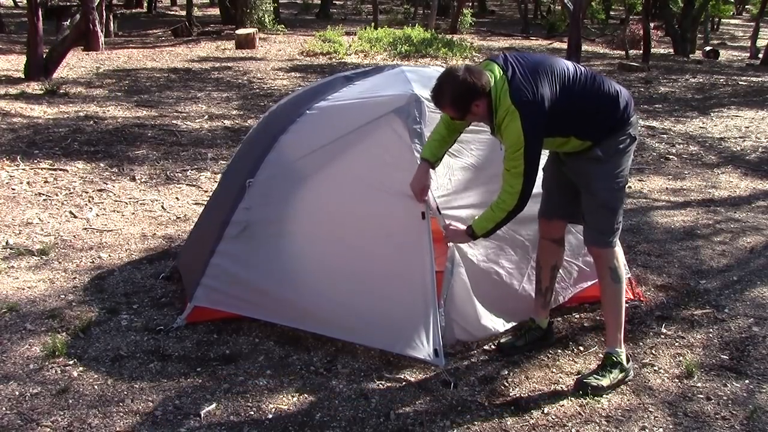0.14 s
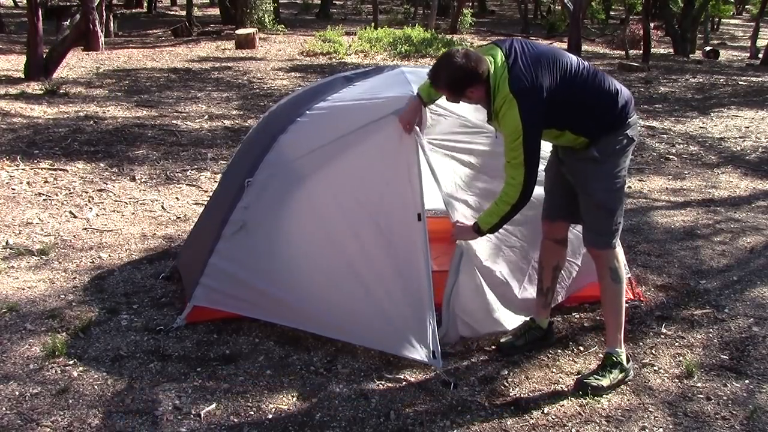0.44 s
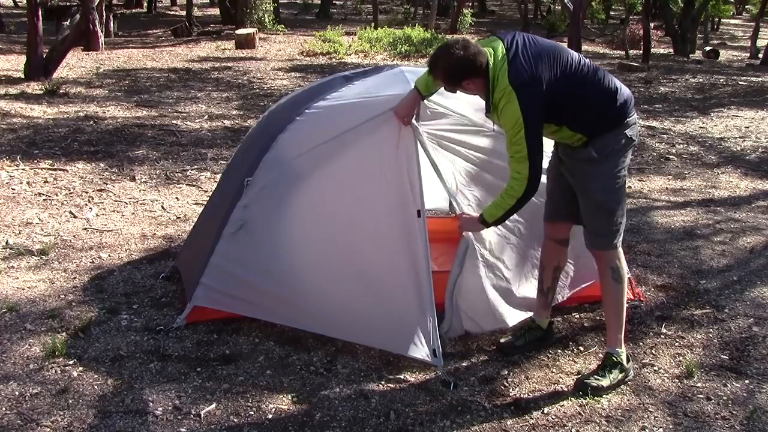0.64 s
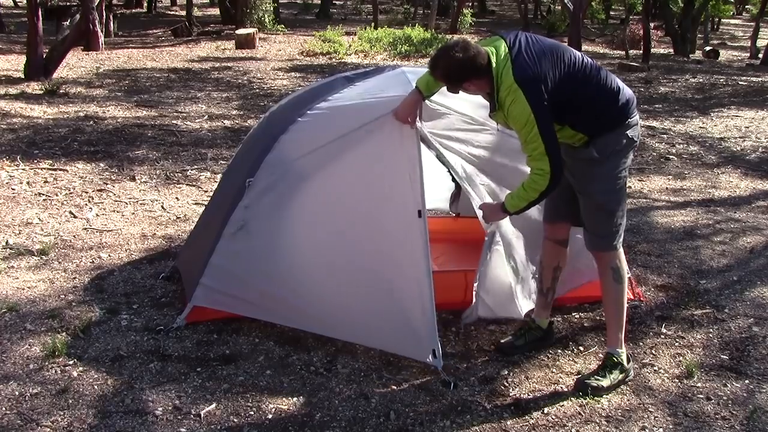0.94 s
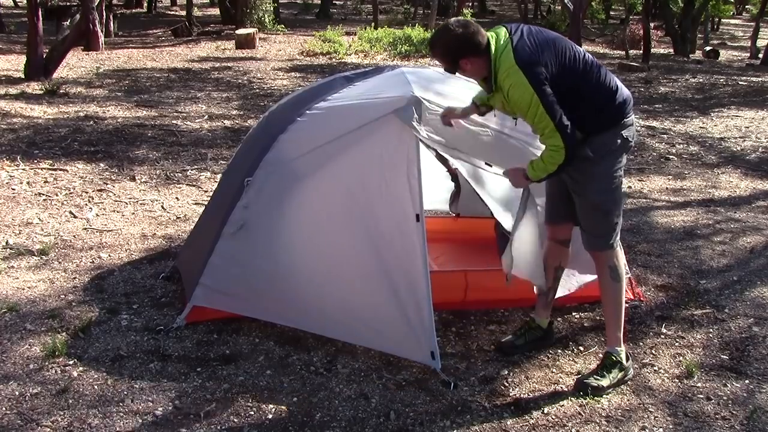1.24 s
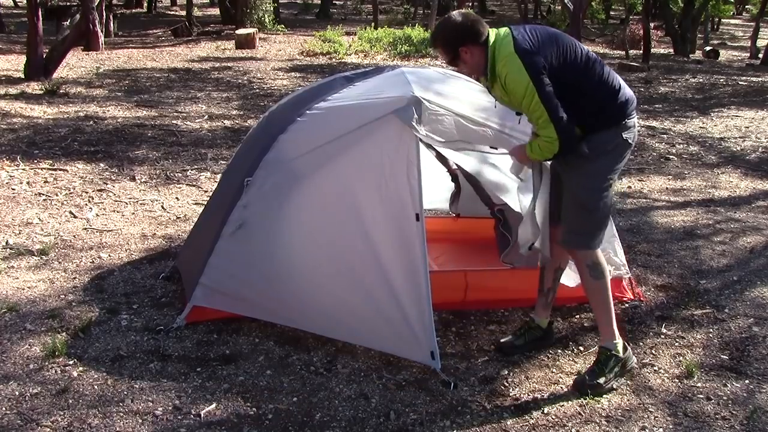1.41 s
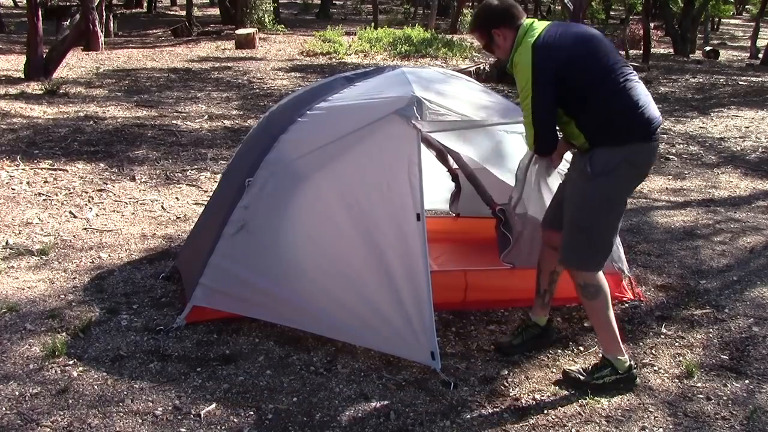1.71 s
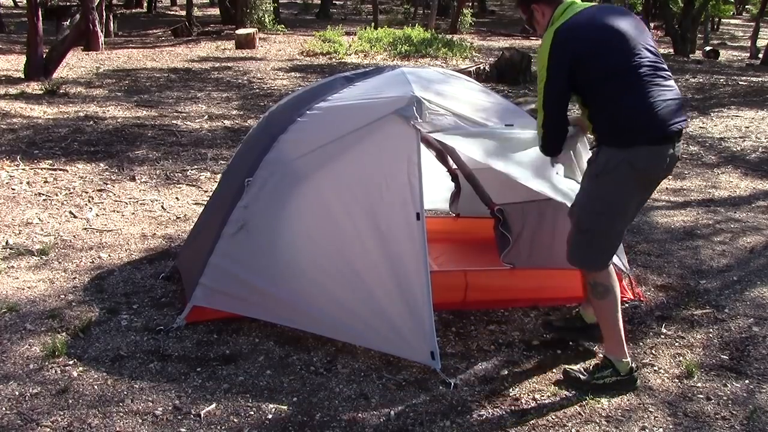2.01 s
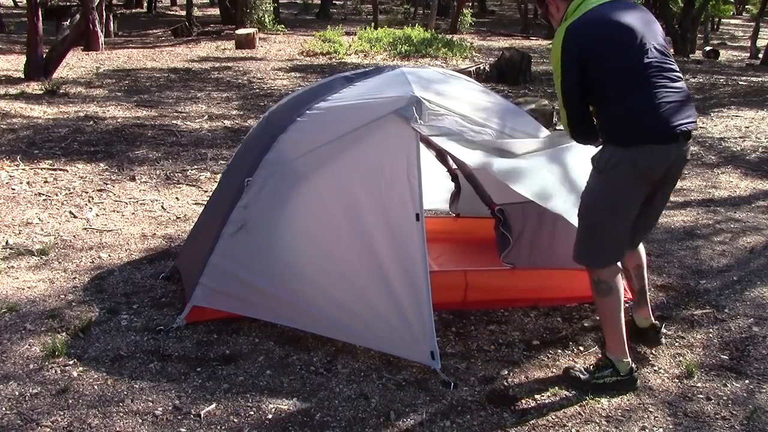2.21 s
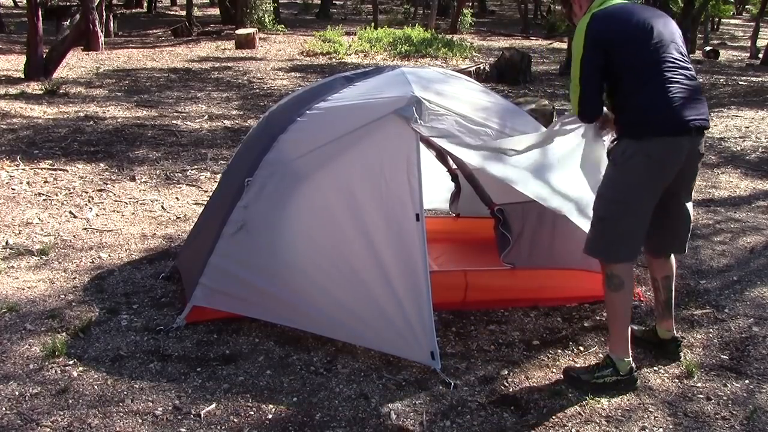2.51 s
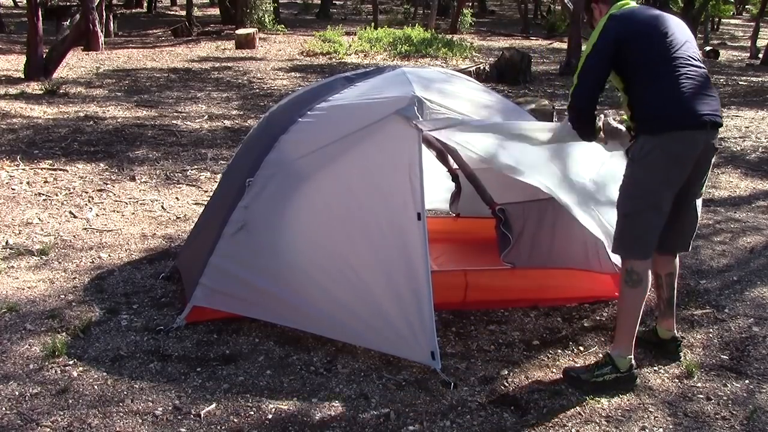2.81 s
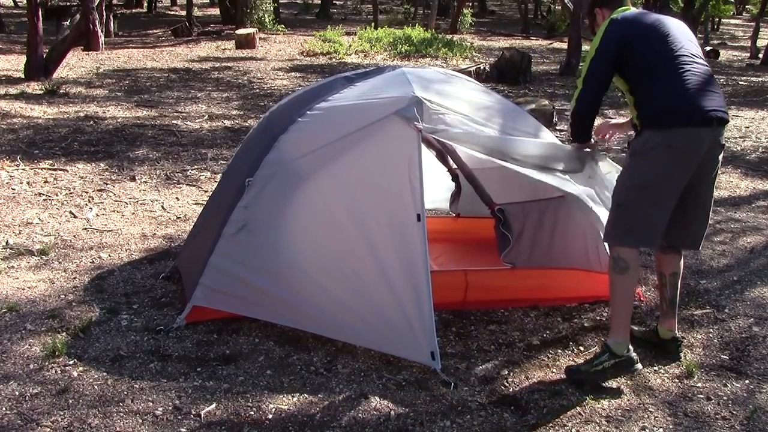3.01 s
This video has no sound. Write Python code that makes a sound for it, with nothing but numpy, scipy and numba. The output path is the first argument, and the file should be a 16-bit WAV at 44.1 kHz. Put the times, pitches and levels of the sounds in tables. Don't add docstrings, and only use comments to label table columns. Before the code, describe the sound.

A tent zipper opens in one pull from about 0.2 to 0.58 seconds, its buzzy tone rising, wavering and stopping with a cloth jerk and snap. Soft rustles and small crackles follow until 1.3, then nylon swishes and pops grow. From 2.0 to 3.1 the door is gathered loudly, with sharp crease snaps, flaps and low air thumps, strongest near 2.0, 2.5 and 2.75. Faint woodland hiss, short echo, muted treble.

```python
import sys
import numpy as np
from scipy import signal
from scipy.fft import rfft, irfft
from scipy.io import wavfile
from scipy.ndimage import uniform_filter1d
from numba import njit

SR = 44100
rng = np.random.default_rng(int(sys.argv[2]) if len(sys.argv) > 2 else 0)


def bounce(signal):
    frames = np.transpose(np.atleast_2d(signal))
    limited = np.clip(frames, -1, 1)
    pcm = np.round(limited * 32767).astype(np.int16)
    wavfile.write(sys.argv[1], SR, pcm)


def attenuation_scalar(level_db):
    decades = np.asarray(level_db, float) / 20
    return 10 ** decades


N = 138915


@njit
def svf(x, hz, width):
    y, band_state, low_state = np.empty(len(x)), 0., 0.
    for i in range(len(x)):
        g, k = np.tan(np.pi * hz[i] / SR), width[i] / hz[i]
        v = (band_state + g * (x[i] - low_state)) / (1 + g * (g + k))
        band_state, low_state, y[i] = 2 * v - band_state, low_state + 2 * g * v, k * v
    return y


def band(x, hz, width):
    return svf(x, np.full(N, 1. * hz), np.full(N, 1. * width))


def unit(x):
    return x / np.sqrt(np.mean(x ** 2))


def walk(rate):
    hold = int(SR / rate)
    steps = np.repeat(rng.standard_normal(N // hold + 1), hold)
    return unit(uniform_filter1d(steps, hold)[:N])


def colour(x, table):
    hz, db = np.array(table).T
    f = np.maximum(np.arange(N // 2 + 1) * SR / N, 1)
    curve_db = np.interp(np.log(f), np.log(hz), db, db[0] - 32, db[-1] - 30)
    return irfft(rfft(x) * attenuation_scalar(curve_db), N)


def clicks(per_s, spread_db):
    place, luck = rng.random((2, int(per_s * 4)))
    size = attenuation_scalar(np.minimum(-spread_db * np.log(luck), 11))
    sign = (-1) ** np.arange(len(size))
    return unit(np.bincount((place * N).astype(int), size * sign, N))


def hump(t, start, length, peak):
    u = np.clip((t - start) / length, 0, 1)
    return np.sin(np.pi / 2 * np.where(u < peak, u / peak, (1 - u) / (1 - peak))) ** 2


# f/Hz, level/dB
WOODS_SPECTRUM = [(24, -48), (40, -29), (150, 3), (800, -20.5), (862, -9.5), (2650, -17), (7560, -22),
                  (9000, -23), (15600, -33.5)]


def woods():
    return attenuation_scalar(-60 + 0.4 * walk(4.6)) * unit(colour(rng.standard_normal(N), WOODS_SPECTRUM))


def echo(t, near):
    t60_s, early = 0.11, t[:8000]
    tail = rng.standard_normal(8000) * attenuation_scalar(-60 * (early / t60_s)) * (early > .004)
    return attenuation_scalar(-20.5) * signal.fftconvolve(near, tail / np.sqrt(np.sum(tail ** 2)))[:N]


def folds(t, events, cycles, tick_db):
    out = np.zeros(N)
    for (start, db, hz), seed in zip(events, rng.random(len(events))):
        u = np.maximum(t - start, 0) * hz
        rise = cycles / 3
        ring = np.sin(2 * np.pi * u) * u / rise * np.exp(1 - u / rise)
        tick = attenuation_scalar(tick_db) * np.sin(2 * np.pi * (2.34 + seed) * u) * np.exp(-u)
        out -= attenuation_scalar(db) * (ring + tick)
    return out


# t/s, peak level/dB, f/Hz
DOOR_BOOMS = [
    (0.189, -30, 194),
    (0.919, -51, 95),
    (1.759, -35.5, 80.5),
    (2.036, -20, 70),
    (2.131, -36, 75.6),
    (2.729, -20, 91),
    (2.875, -26.5, 102),
]


def booms(t):
    return folds(t, DOOR_BOOMS, 1.0, -37)


# t/s, length/s, level/dB,
# centre f/Hz
PANEL_FLAPS = [(0, 0.048, -54.5, 252), (0.138, 0.1, -36.5, 375), (0.148, 0.066, -38.5, 1310),
               (0.187, 0.047, -33, 450), (0.22, 0.57, -34, 326), (0.581, 0.049, -42, 360.4),
               (0.644, 0.079, -36, 360), (0.755, 0.69, -50, 364), (0.195, 0.12, -28, 1000),
               (1.022, 0.089, -42.5, 410), (1.146, 0.16, -44, 367), (1.282, 0.08, -31.5, 336),
               (1.34, 0.14, -37.5, 390), (1.412, 0.11, -37, 960), (1.505, 0.096, -29.5, 343),
               (1.554, 0.24, -37, 355), (1.741, 0.12, -28.5, 370), (1.839, 0.17, -28.5, 370),
               (1.938, 0.033, -27, 278), (1.976, 0.035, -29.5, 354), (2.014, 0.092, -21.5, 272),
               (2.081, 0.13, -28, 354), (2.162, 0.2, -25.5, 357), (2.316, 0.16, -39.5, 375),
               (2.455, 0.097, -30, 286), (2.54, 0.21, -35.5, 345), (2.725, 0.068, -20.5, 366),
               (2.758, 0.12, -37, 287), (2.871, 0.09, -33.5, 422), (2.959, 0.11, -32, 310),
               (3.003, 0.052, -25.5, 1370), (3.018, 0.1, -39, 300), (2.86, 0.034, -40, 1900),
               (0.882, 0.18, -57.5, 1680), (1.19, 0.027, -54, 1770), (2.13, 0.09, -24.5, 2230),
               (2.583, 0.059, -25.5, 2100), (2.641, .06, -23.5, 1960), (2.957, 0.038, -27.5, 1670),
               (3.097, 0.054, -31.5, 1950), (3.132, 0.034, -26, 5000)]


def flaps(t):
    drive = rng.standard_normal(N) + clicks(per_s=220, spread_db=2.6)
    rumble, out = attenuation_scalar(-12.5) * unit(band(drive, 142, 54)), np.zeros(N)
    for start, length, db, hz in PANEL_FLAPS:
        part = slice(int(start * SR), int((start + length) * SR))
        half_hz = 0.52 * min(hz, max(700, 0.41 * hz))
        edges_hz = [hz - half_hz, hz + 1.26 * half_hz]
        panel = signal.butter(2, edges_hz, "band", fs=SR, output="sos")
        body = unit(signal.sosfilt(panel, drive[part]))
        swell = hump(t[part], start, length, peak=0.32) ** .5
        out[part] += attenuation_scalar(db) * swell * (body + rumble[part] * 300 / hz)
    return attenuation_scalar(2 * walk(45)) * out


# t/s, fade/s, level/dB, treble level/dB, tilt/dB per octave
CLOTH_JERKS = [(0, 0.017, -45, -34, -1), (0.577, 0.075, -31.5, -31, 0.5), (0.648, 0.036, -36, -43, 3.5),
               (1.319, 0.0088, -22.5, -40, 1.2), (1.405, 0.07, -35, -38, 1.5),
               (1.522, 0.18, -28.5, -32.5, -0.3), (1.672, 0.031, -28.5, -38, -6),
               (1.945, 0.056, -21.5, -36, -1.5), (1.993, 0.22, -22, -36, -1.8),
               (2.047, 0.055, -16.5, -21.5, 3), (2.463, 0.14, -19, -32, 1.5),
               (2.522, 0.014, -15, -28, -0.5), (2.737, 0.027, -17, -35, 0), (2.885, 0.13, -22.5, -26, -0.3)]
# t/s, length/s, level/dB, treble level/dB, tilt/dB per octave
CLOTH_DRAGS = [(0.128, 0.097, -62, -40, 11.5), (0.177, 0.11, -48.5, -40, 6), (0.831, 0.31, -52, -30, -2.5),
               (1.068, 0.25, -48, -29, -4.5), (1.262, 0.17, -38.5, -36, 2), (1.551, 0.1, -34.5, -29, 8),
               (1.664, 0.13, -40, -32, -16.5), (1.738, 0.13, -29, -39, -2), (1.815, .1, -29, -31, 1),
               (1.902, 0.058, -32, -30, -7), (2.074, 0.16, -22.5, -29.5, -2),
               (2.191, 0.14, -19.5, -22.5, 0.1), (2.285, 0.14, -23.5, -32, 0), (2.37, 0.17, -23, -44, 0.9),
               (2.545, 0.074, -26.5, -42, 5), (2.59, 0.073, -16.5, -21.5, 2.3),
               (2.615, 0.18, -26.5, -36, -0.5), (2.746, 0.077, -37, -42, -14.5),
               (2.805, 0.2, -41.5, -32, -9.5), (2.942, 0.14, -22, -23, -2), (3.025, 0.12, -38, -29, -7),
               (3.123, 0.063, -25.5, -20.5, -3.5)]
# f/Hz, level/dB
CLOTH_SPECTRUM = [(290, 1), (500, -7.5), (786, -8.5), (1970, -4), (4700, -4), (7000, -3.5), (9100, -10.5),
                  (15400, -120)]
# f/Hz, level/dB
CLOTH_SHEEN = [(5060, -45), (8600, -5), (11100, -0.5), (15600, 1)]


def cloth(t):
    efforts = []
    for start, fade, *_ in CLOTH_JERKS:
        attack = np.clip((t - start) / 0.0038, 0, 1)
        efforts.append(attack * np.exp(-np.maximum(t - start, 0) / fade))
    for start, length, *_ in CLOTH_DRAGS:
        efforts.append(hump(t, start, length, peak=0.58) ** .5)
    strokes = CLOTH_JERKS + CLOTH_DRAGS
    power = np.array([(attenuation_scalar(row[2]) * e) ** 2 for row, e in zip(strokes, efforts)])
    total = power.sum(axis=0)
    tilt = np.array(strokes)[:, 4] @ power / (total + 1e-12)
    speed = np.sqrt(sum((attenuation_scalar(row[2] + row[3]) * e ** 2) ** 2 for row, e in zip(strokes, efforts)))

    shared_db = .4 * walk(35.11)
    creases = [attenuation_scalar(-1) * clicks(per_s=260, spread_db=4.0) for _ in range(10)]
    swish = np.zeros(N)
    for k, hz in enumerate(600 * 2 ** np.arange(0, 3.8, .5)):
        grain = rng.standard_normal(N) + sum(creases[k:k + 3]) * attenuation_scalar(-4.5 - 0.5 * k)
        flicker_db = 2.9 * (walk(30.18) + walk(9) / 2)
        level = attenuation_scalar(shared_db + flicker_db + tilt * np.log2(hz / 2500))
        swish += level * band(colour(grain, CLOTH_SPECTRUM), hz, hz / 2.086)

    top = np.zeros(N)
    for hz in 9500 + 1800 * np.arange(4):
        top += attenuation_scalar(4.5 * walk(14)) * band(rng.standard_normal(N), hz, 1800)
    return np.sqrt(total) * attenuation_scalar(4.0) * swish, speed * unit(colour(top, CLOTH_SHEEN))


# t/s, peak level/dB, f/Hz
FOLD_POPS = [(.609, -21.5, 521), (0.653, -15, 332), (0.667, -22, 420), (0.68, -27, 450), (.704, -29, 550),
             (0.724, -24.5, 540), (0.77, -29, 330), (.826, -38, 400), (.922, -32, 570), (1.039, -29, 327),
             (1.068, -28, 380), (1.213, -31, 426), (1.29, -28, 305), (1.532, -12.5, 450),
             (1.677, -19.5, 366), (1.944, -19.5, 334), (1.992, -12.5, 278), (2.045, -6.5, 304),
             (2.165, -13, 480), (2.74, -16.5, 407), (2.7745, -4, 390), (2.9, -13, 362), (2.986, -18.5, 300)]


def pops(t):
    return folds(t, FOLD_POPS, 1.0, -9)


# t/s, peak level/dB, f/Hz
CREASE_SNAPS = [(0.5784, -16.5, 1870), (0.893, -36, 1626), (.945, -34, 3600), (.98, -41, 1870),
                (1.081, -32, 1900), (1.122, -34, 1840), (1.1567, -26, 1160), (1.1826, -24, 1900),
                (1.251, -34, 1640), (1.308, -24, 2440), (1.3241, -18.5, 1440), (1.4103, -23.5, 990),
                (1.469, -26.5, 1080), (1.5327, -16, 960), (1.567, -20.5, 2100), (1.6209, -17.5, 1430),
                (1.701, -14.5, 1940), (1.786, -17.5, 1230), (1.932, -18, 1290), (2.111, -12, 1530),
                (2.2758, -5, 2330), (2.416, -8, 4350), (2.478, -2, 3250), (2.5278, -6.5, 2340),
                (2.611, -13, 2000), (2.635, -5, 2200), (2.6834, -5, 1990), (2.695, -9, 2290),
                (2.797, -12.5, 4150), (2.8556, -26, 1060), (2.889, -24, 2500), (2.901, -15.5, 1150),
                (2.9485, -16, 2030), (3.011, -9, 1840), (3.055, -17, 1510), (3.066, -18, 3800),
                (3.117, -30, 2250)]


def snaps(t):
    return folds(t, CREASE_SNAPS, 2.2, -9)


# t/s, tooth rate f/Hz, tone level/dB, rasp level/dB
SLIDER_PULL = [
    (.205, 393.2, -26, -41),
    (.248, 419, -26, -38.5),
    (.293, 629.5, -22.5, -32.5),
    (.355, 661.2, -19, -33),
    (.42, 814.5, -22, -29),
    (0.482, 602, -18.5, -29.5),
    (0.544, 664.5, -18.5, -31),
    (0.559, 584, -20, -32),
    (0.581, 475, -30.5, -31),
]
# t/s, level/dB
SLIDER_SNAGS = [
    (0.257, -10),
    (.285, -3.5),
    (0.315, -3),
    (0.362, -8.5),
    (0.405, -4),
    (0.428, -8),
    (.472, -1),
    (.527, -3.5),
]
# f/Hz, width f/Hz, level/dB
TAPE_MODES = [
    (1616, 280, 0),
    (2460, 720, 0.5),
    (5100, 14000, -6),
]
# multiple of tooth rate, level/dB
TOOTH_OVERTONES = [
    (2, -3),
    (3, -4),
]
# f/Hz, level/dB
TAPE_HISS = [(7000, -31), (9000, 2), (11500, 2), (13500, -7), (15600, -20)]


def zipper(t):
    s, hz, tone_db, rasp_db = np.array(SLIDER_PULL).T
    on = np.clip(np.minimum((t - s[0]) / 0.017, (s[-1] - t) / 0.0089), 0, 1)
    unevenness = 1 + .036 * walk(60) + .05 * walk(500)
    teeth = np.cumsum(np.interp(t, s, hz) * unevenness) / SR
    level = on * attenuation_scalar(np.interp(t, s, rasp_db))
    full_rasp_db = -26

    def partial(cycles):
        return attenuation_scalar(1.9 * (walk(110) + walk(350))) * np.sin(2 * np.pi * cycles)

    choke_db = sum(db * np.exp(-((t - at) / .007) ** 2) for at, db in SLIDER_SNAGS)
    tone = on * np.sqrt(2) * attenuation_scalar(np.interp(t, s, tone_db) + choke_db + 1.0) * partial(teeth)

    (low, low_db), (_, high_db) = TOOTH_OVERTONES
    stretched = np.cumsum(np.gradient(teeth) * np.interp(t, (.49, .53), (3, 3.4)))
    overtones = attenuation_scalar(low_db) * partial(low * teeth) + attenuation_scalar(high_db) * partial(stretched)
    ring = np.zeros(N)
    for f, width, _ in TAPE_MODES[:2]:
        ring += band(band(band(overtones, f, 2.1 * width), f, 2.0 * width), f, 2 * width)
    ring = ring * level ** 2 / attenuation_scalar(full_rasp_db) * attenuation_scalar(12.5)

    gate = np.exp(-(teeth % 1))
    ticks = np.diff(np.floor(teeth), prepend=0) * attenuation_scalar(2.7 * rng.standard_normal(N))
    drive = unit(gate * rng.standard_normal(N)) + attenuation_scalar(-13) * unit(ticks)
    modes = [attenuation_scalar(db) * band(drive, f, width) for f, width, db in TAPE_MODES]
    rasp = unit(sum((-1) ** k * mode for k, mode in enumerate(modes)))

    hiss, hiss_drive = np.zeros(N), colour(drive, TAPE_HISS)
    for f in 9000 + 1500 * np.arange(5):
        hiss += attenuation_scalar(5.3 * walk(25.3)) * band(hiss_drive, f, 1500)
    sheen = attenuation_scalar(-19 - full_rasp_db) * level ** 2 * unit(hiss)
    return tone + ring + attenuation_scalar(5.5) * level * rasp, sheen


def scene():
    t = np.arange(N) / SR
    swish, cloth_top = cloth(t)
    zip_body, zip_top = zipper(t)
    near = booms(t) + flaps(t) + swish + pops(t) + snaps(t) + zip_body
    near = near + echo(t, near)
    roll_off = signal.cheby1(6, .5, 6520, fs=SR, output="sos")
    near = signal.sosfilt(roll_off, near)
    return (woods() + near + cloth_top + zip_top)[None]


def low_pass(x):
    return signal.sosfilt(signal.butter(12, 15740, fs=SR, output="sos"), x)


def record(dry):
    mic = signal.sosfilt(signal.butter(2, 80, "high", fs=SR, output="sos"), dry)
    return low_pass(np.tanh(mic))


dry = scene()
out = record(dry)
bounce(out)
```